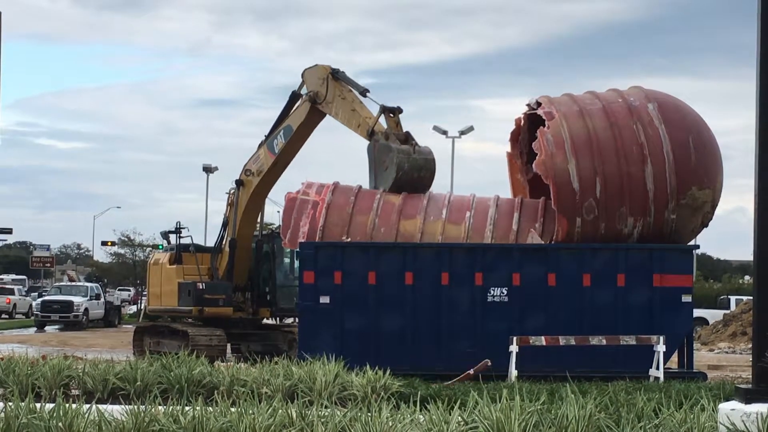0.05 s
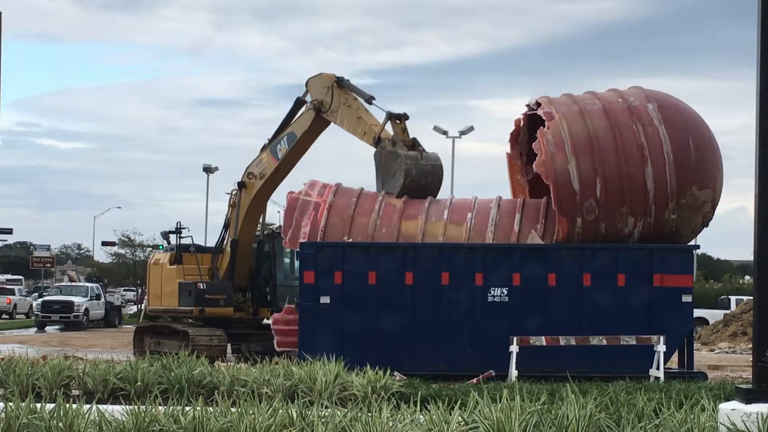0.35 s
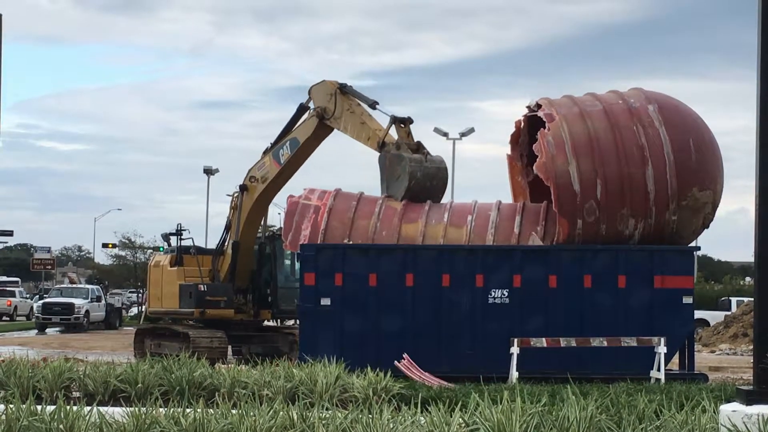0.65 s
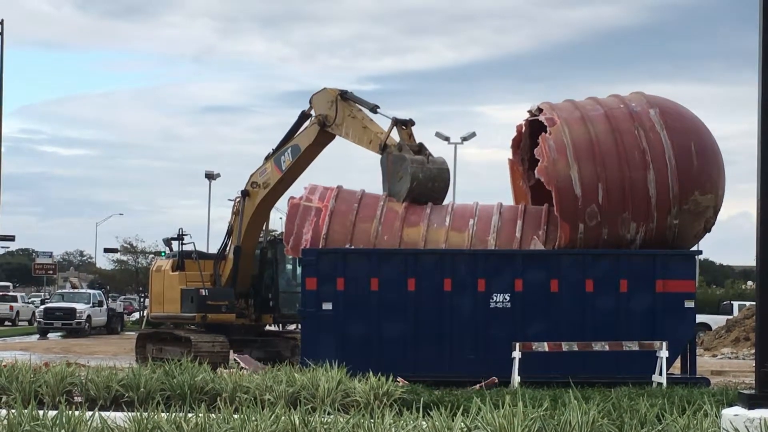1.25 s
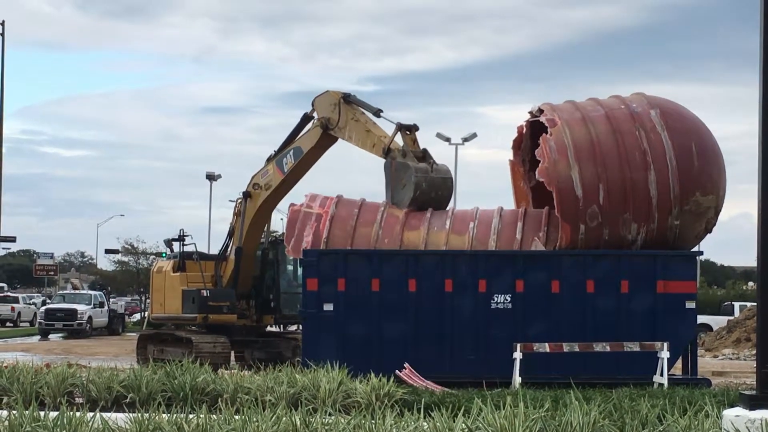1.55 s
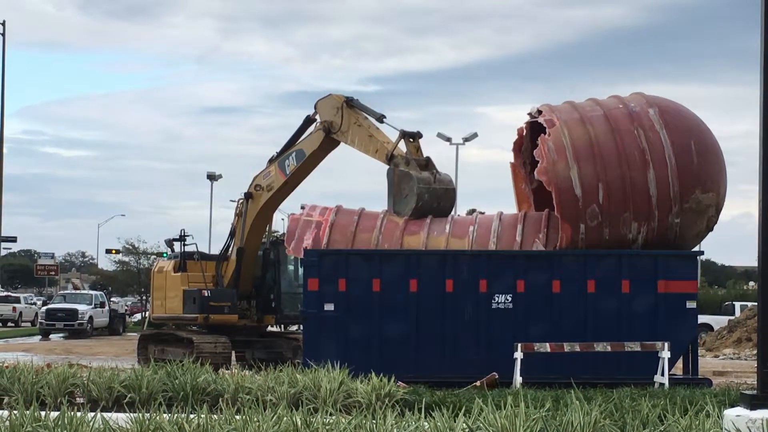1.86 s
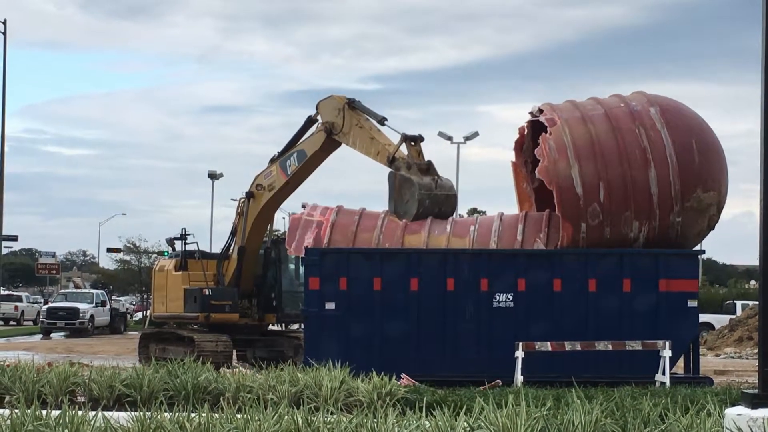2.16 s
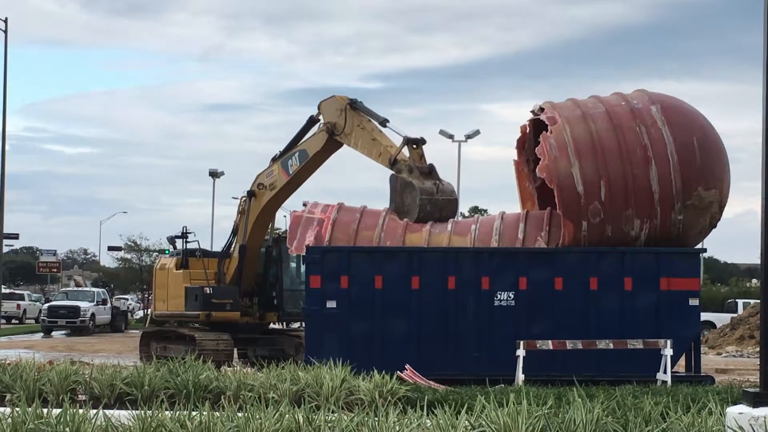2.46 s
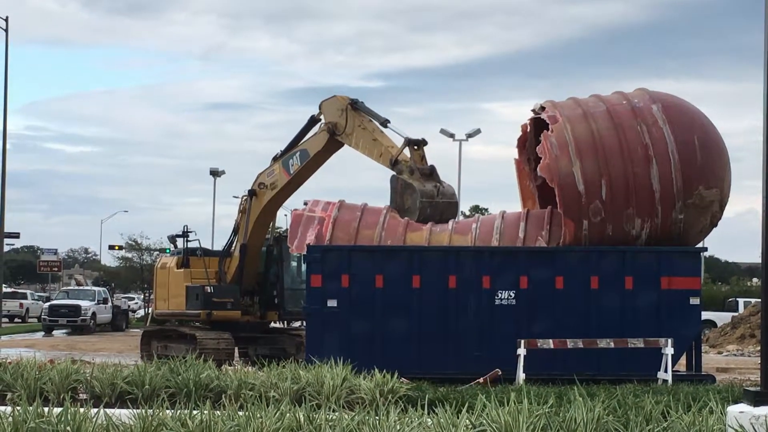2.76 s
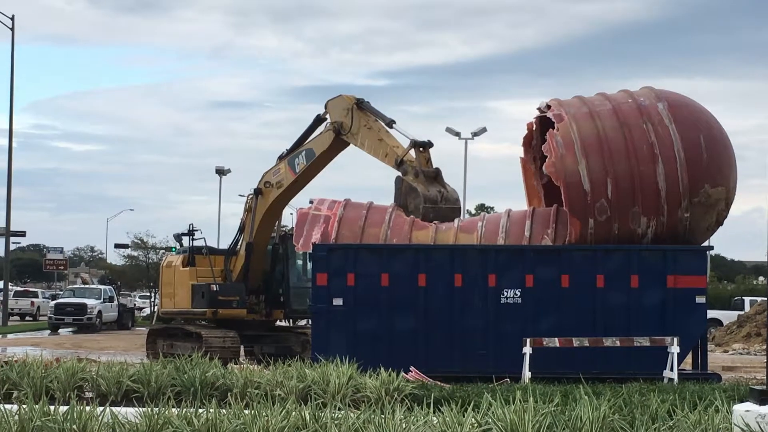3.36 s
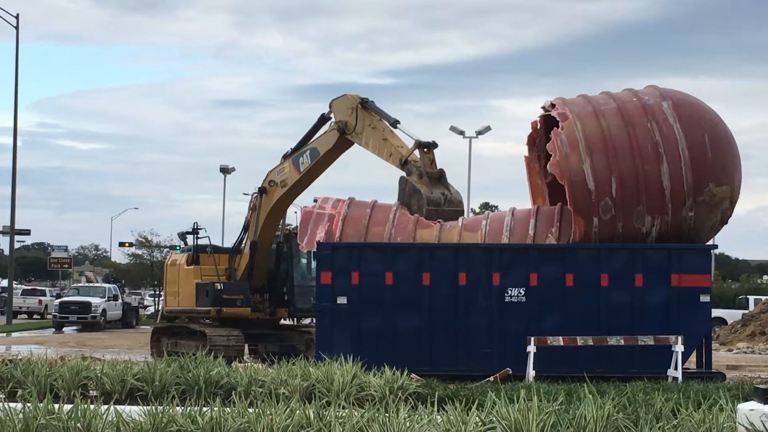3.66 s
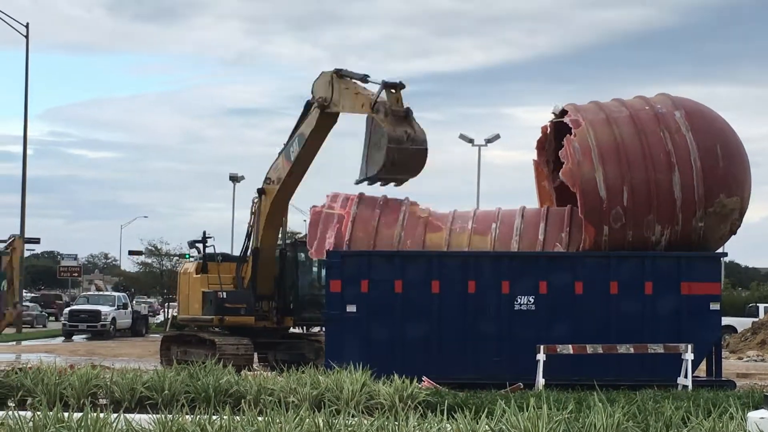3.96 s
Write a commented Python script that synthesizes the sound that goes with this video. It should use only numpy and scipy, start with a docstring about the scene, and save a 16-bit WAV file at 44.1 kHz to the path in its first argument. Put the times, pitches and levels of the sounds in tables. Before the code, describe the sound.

Fibreglass splinters and snaps as an excavator crushes a hollow tank in a steel skip outdoors. Two loud cracks come first, then a brief lull, then four more with dull thuds and short echoes, all over low engine rumble.

```python
"""An excavator crushes a tank

Across an open site, an excavator presses its bucket into a fibreglass tank lying in a steel skip.
The wall gives way in six loud cracks that knock the shell and boom in the hollow; between them it
snaps, crackles and buckles under the load. The diesel engine rumbles throughout."""
import sys
import numpy as np
from scipy import signal
from scipy.fft import rfft, irfft, next_fast_len
from scipy.io import wavfile
from scipy.ndimage import uniform_filter1d

SR = 44100
rng = np.random.default_rng(int(sys.argv[2]) if len(sys.argv) > 2 else 0)


def digitize_waveform(pressure):
    """Quantize a signal to 16-bit integers and store it at the path in sys.argv[1].

    Rows of a 2-D input are taken as channels; values are limited to [-1, 1].
    """
    field = np.atleast_2d(pressure).T
    bounded = np.clip(field, -1, 1)
    quanta = np.round(bounded * 32767).astype(np.int16)
    wavfile.write(sys.argv[1], SR, quanta)


N = 176400  # 4 seconds


def amp(db):
    """Turn decibels into a number to multiply by."""
    return 10 ** (np.asarray(db) / 20)

def rms_one(x):
    """Scale a sound to an average (rms) strength of 1."""
    return x / np.sqrt(np.mean(x ** 2) + 1e-20)

def level(rows):
    """Join (t/s, level/dB) points into a volume curve."""
    return amp(np.interp(np.arange(N) / SR, *np.transpose(rows)))

def drift(rate_hz):
    """A smooth random wobble, about 1 in size."""
    step = 40  # samples between random points
    pole = np.exp(-2 * np.pi * rate_hz * step / SR)
    noise = rng.standard_normal(N // step + 2002)
    slow = signal.lfilter([1], [1, -2 * pole, pole * pole], noise)[2000:]
    return np.interp(np.arange(N) / step, np.arange(len(slow)), rms_one(slow))

def colour(x, points):
    """Shape a sound's bass and treble to follow (f/Hz, level/dB) points."""
    size = 2 * next_fast_len(len(x))
    hz, db = np.transpose(points)
    log_hz = np.log(np.arange(size // 2 + 1) * SR / size + 1)
    cepstrum = irfft(np.log(amp(np.interp(log_hz, np.log(hz), db))))
    # minimum phase: nothing rings before the hit that causes it
    cepstrum[1:size // 2] *= 2
    cepstrum[size // 2 + 1:] = 0
    return irfft(rfft(x, size) * np.exp(rfft(cepstrum)))[:len(x)]

def add(out, s, sound):
    """Mix a sound in, starting at s seconds."""
    i = max(int(s * SR), 0)
    out[i:i + len(sound)] += sound[:max(len(out) - i, 0)]

def clicks(count, per_s, spread_db):
    """Random clicks of uneven size and sign."""
    sizes = amp(spread_db * np.minimum(rng.exponential(1, count), 4))
    return sizes * rng.choice([-1, 1], count) * (rng.random(count) < per_s / SR)

def shiver(hits, t60):
    """Each break shakes its patch of wall: a burst of noise that fades by 60 dB in t60 seconds."""
    energy = signal.lfilter([1], [1, -amp(-120 / (t60 * SR))], hits ** 2 + 1e-18)
    return np.sqrt(energy) * rng.standard_normal(len(hits))

def ring(hz, db, t60):
    """One struck note that swells over its first cycle and dies away."""
    t = np.arange(SR // 2) / SR
    return 2 * amp(db - 60 * t / t60) * np.sin(2 * np.pi * hz * t) * np.minimum(t * hz, 1)


# The deep tone of the engine: f/Hz, level/dB
ENGINE_TONE = [(15, -62), (30, -50), (41, 0.5), (50, -10.0), (64, 4.0), (85, 3.0), (115, -10.5),
               (160, -5.5), (200, -9.0), (260, -22.5), (500, -30.0), (2000, -68.5)]
# The engine works harder while the bucket bears down: t/s, level/dB
ENGINE_EFFORT = [(0, -31.5), (.6, -29.5), (1.35, -33.5), (2.3, -29.5), (3.1, -33.5), (4, -31.5)]

def engine():
    """The diesel rumbles, with a faint, unsteady hum from its firing."""
    firing_hz = 113.3 * (1 + 0.0309 * drift(rate_hz=5.96))
    hum = np.sin(2 * np.pi * np.cumsum(firing_hz) / SR)
    rumble = colour(rng.standard_normal(N), ENGINE_TONE)
    power = uniform_filter1d(rumble ** 2, size=int(0.12 * SR)) + 1e-9
    steadier = rumble / power ** 0.1  # evens out the lumps a little
    return level(ENGINE_EFFORT) * rms_one(steadier) + amp(-40) * rms_one(hum)


# The tone of the outdoor background: f/Hz, level/dB
SITE_TONE = [(40, -17), (280, 11.5), (450, 3.5), (750, 3.5), (1300, 0.5), (2100, -4), (2950, -18),
             (3250, -4), (4200, -8.5), (6600, -17), (7500, -20), (15000, -28)]

def site():
    """A steady outdoor wash of noise with a thin, shrill edge."""
    return amp(-41.5) * rms_one(colour(rng.standard_normal(N), SITE_TONE))


FIBRE_T60_S, SHELL_T60_S = .019, .036  # how long one tiny break rings
# The bright tone of splitting fibres: f/Hz, level/dB
SPLINTER_TONE = [(300, -26), (1000, 4.5), (1400, 1.5), (2100, 4.5), (2550, -3), (3000, 1), (3500, 5),
                 (4600, -2.5), (6500, -1), (7400, -6.5), (9200, -6.5), (10500, -11.5), (12000, -10.5),
                 (13500, -17), (16000, -19)]
# The low tone of the crunching shell: f/Hz, level/dB
CRUNCH_TONE = [(50, -17), (110, 10), (180, 9.5), (250, 1.5), (380, 4), (550, 1.5), (750, -6), (1000, -8),
               (1400, -17), (1900, -21.5), (2600, -16.5), (5000, -70), (15000, -46)]
# How loudly the fibres crackle: t/s, level/dB
CRACKLE_LEVELS = [(0, -48.5), (.06, -45), (.16, -35.5), (.5, -35.5), (.58, -38.5), (.75, -36.5),
                  (.83, -41.5), (.9, -40.5), (1.0, -39), (1.08, -45), (1.33, -51), (1.46, -51.5),
                  (1.56, -38), (1.71, -35.5), (1.75, -39.5), (1.87, -33), (2.08, -39.5), (2.26, -31),
                  (2.42, -38.5), (2.55, -42.5), (2.68, -37.5), (2.84, -48.5), (2.98, -39), (3.07, -48.5),
                  (3.25, -36.5), (3.41, -43), (3.57, -33), (3.71, -44.5), (3.88, -38), (4, -40.5)]
# How loudly the shell crunches: t/s, level/dB
CRUNCH_LEVELS = [(0, -45.5), (.15, -29.5), (.3, -30), (.48, -28.5), (.62, -34.5), (.9, -30.5), (1.12, -51),
                 (1.45, -42.5), (1.58, -41), (1.67, -30), (1.8, -32.5), (2.08, -34), (2.28, -26),
                 (2.4, -34.5), (2.58, -33.5), (2.67, -22.5), (2.73, -33), (2.83, -40), (2.96, -34.5),
                 (3.07, -40), (3.42, -45), (3.49, -36), (3.59, -32.5), (3.70, -44), (4, -37)]

def crushing():
    """Fibres part and the shell crunches in shared clumps as the bucket bears down."""
    clumps = amp(1.7 * drift(rate_hz=6.7))
    fibres = shiver(clumps * clicks(N, per_s=1700, spread_db=2.8), FIBRE_T60_S)
    shell = shiver(clumps * clicks(N, per_s=620, spread_db=2.5), SHELL_T60_S)
    crackle = level(CRACKLE_LEVELS) * rms_one(colour(fibres, SPLINTER_TONE))
    crunch = level(CRUNCH_LEVELS) * rms_one(colour(shell, CRUNCH_TONE))
    return crackle + crunch


def tear(length_s, tone, db, t60):
    """A split runs through the wall: one hard break, then a quick string of others."""
    t = np.arange(SR // 10) / SR
    breaks = clicks(len(t), per_s=380, spread_db=2)
    breaks[0] = amp(1.5)
    fade = amp(-3.5 * t / length_s) * np.clip((length_s - t) * 1000, 0, 1)
    sound = colour(shiver(breaks * fade, t60), tone)
    return amp(db) * sound * np.sqrt(length_s * SR / np.sum(sound ** 2))


# The tone of a small knock on the shell: f/Hz, level/dB
KNOCK_TONE = [(100, -21), (250, -1.5), (420, -2.5), (650, 1), (1000, -2.5), (1400, -11.5), (1950, -3),
              (2600, -16), (5000, -12), (15000, -63)]
# Quick snaps: t/s, splinter level/dB, knock level/dB
QUICK_SNAPS = [(.111, -43, -28), (.138, -30.5, -23), (.146, -28, -23), (.180, -40, -28), (.2138, -38, -24),
               (0.2363, -37, -29), (0.2555, -44, -28), (.269, -25.5, -27), (0.4401, -25, -34),
               (.507, -34, -50), (.897, -28.5, -44), (1.179, -33, -44), (1.188, -31.5, -56),
               (1.519, -32.5, -31), (1.6128, -37, -27), (1.649, -36, -27), (1.698, -28, -29),
               (1.8148, -27.5, -35), (1.8961, -32.5, -24.5), (1.975, -35, -25), (1.9974, -30.5, -25),
               (2.121, -33, -28), (2.227, -45, -23.5), (2.3521, -33, -30), (2.496, -30.5, -30),
               (2.5626, -29.5, -40), (2.939, -56, -30.5), (2.996, -33, -34), (3.46, -32.5, -35.5),
               (3.5071, -37, -19.5), (3.5449, -30, -22), (3.937, -25.5, -25)]
# Longer rips: t/s, tearing time/s, splinter level/dB, knock level/dB
LONG_RIPS = [(.877, 0.019, -35.5, -33), (1.675, 0.017, -31.5, -37), (1.687, 0.021, -27.5, -30),
             (3.486, 0.013, -38, -31.5), (3.595, .014, -35.5, -34)]

def snaps(snap_s=.004):
    """The wall snaps and rips; each patch knocks at a pitch of its own."""
    out = np.zeros(N)
    quick = [(s, snap_s, *levels) for s, *levels in QUICK_SNAPS]
    for s, length_s, splinter_db, knock_db in quick + LONG_RIPS:
        octaves = .25 * rng.uniform(-1.27, 1)
        knock_tone = [(hz * 2 ** octaves, db) for hz, db in KNOCK_TONE]
        add(out, s, tear(length_s, SPLINTER_TONE, splinter_db, FIBRE_T60_S))
        add(out, s, tear(length_s, knock_tone, knock_db, SHELL_T60_S))
    return out + echoes(out)


# The skip and the site ring on: lowest f/Hz, highest f/Hz, level/dB, time to fade by 60 dB/s
ECHO_BANDS = [(110, 330, -5.5, .48), (428, 747, -6, 0.37), (950, 2200, -5, 0.41), (2430, 11000, -9, 0.52)]

def echoes(x, swell_s=0.0047):
    """One dull slap off the skip, and a scattered tail that dies band by band."""
    t = np.arange(SR) / SR
    tail = 0
    for low, high, db, t60 in ECHO_BANDS:
        dying = rng.standard_normal(SR) * amp(-60 * t / t60) * (1 - np.exp(-t / swell_s))
        band = signal.butter(2, [low, high], "band", fs=SR, output="sos")
        tail = tail + amp(db) * signal.sosfilt(band, dying / np.sqrt(np.sum(dying ** 2)))
    slap = signal.sosfilt(signal.butter(1, 2000, fs=SR, output="sos"), x)
    out = np.zeros(len(x))
    add(out, .018, signal.fftconvolve(x, tail))
    add(out, .029, amp(-14.5) * slap)
    return out


# Thuds of the bending wall: t/s, f/Hz, level/dB
THUDS = [(0.168, 80, -17), (0.411, 86, -25), (1.766, 133, -22.5), (1.81, 103.6, -16.5), (1.835, 131, -18),
         (2.27, 73.5, -17.5), (2.657, 126, -20), (2.727, 82, -14), (3.96, 109, -24.5)]

def buckles():
    """The hollow tank gives a dull thud each time its wall buckles."""
    out = np.zeros(N)
    for s, hz, db in THUDS:
        add(out, s, ring(hz, db, t60=0.095))
    return out


# The tone of a hard knock on the shell: f/Hz, level/dB
SHELL_TONE = [(60, -37), (150, -4.5), (230, -3), (340, 2.5), (480, 2), (620, 1), (820, -4.5), (1250, -12),
              (1650, -13), (2300, -18.5), (5000, -21), (15000, -89)]
# The six big cracks: t/s, tearing time/s, splinter level/dB,
# knock level/dB, knock pitch/ratio, knock bass cut f/Hz, panel f/Hz, panel level/dB,
# upper panel note f/Hz, its level/dB, echo level/dB, boom f/Hz, boom level/dB
BIG_CRACKS = [(0.3246, .011, -24.5, -13, 1.21, 130, 462, -21, 1820, -20.5, 0.5, 104, -17),
              (.674, .012, -25, -13, 0.94, 397, 363, -10.5, 717, -14.5, 2, 90.5, -29),
              (1.4676, .014, -28.5, -23, 1.13, 100, 502, -21.5, 856, -27, -1, 99, -22.5),
              (2.1358, .02, -27.5, -15.5, 0.87, 120, 408, -17.5, 840, -19, 0, 69, -13.5),
              (2.4306, 0.017, -24, -15, 1.02, 110, 522, -19.5, 1197, -21, 2, 75.8, -8),
              (2.6153, 0.0087, -22, -14, 1.15, 90, 411, -26, 900, -16.5, 2.5, 88, -12)]

def cracks():
    """The wall gives way: splinters and a knock echo, the freed panel rings and the hollow booms."""
    out = np.zeros(N)
    for (s, length_s, splinter_db, knock_db, pitch, cut_hz, panel_hz, panel_db,
         upper_hz, upper_db, echo_db, boom_hz, boom_db) in BIG_CRACKS:
        knock_tone = [(hz * pitch, db) for hz, db in SHELL_TONE]
        bass_cut = signal.butter(3, cut_hz, "high", fs=SR, output="sos")
        crack = np.zeros(SR)
        add(crack, 0, tear(length_s, SPLINTER_TONE, splinter_db, FIBRE_T60_S))
        add(crack, 0, signal.sosfilt(bass_cut, tear(length_s, knock_tone, knock_db, SHELL_T60_S)))
        add(out, s, crack + amp(echo_db) * echoes(crack))
        add(out, s, panel(panel_hz, panel_db, upper_hz, upper_db) + boom(boom_hz, boom_db))
    return out

def panel(hz, db, upper_hz, upper_db):
    """A freed piece of wall rings briefly with three notes at once."""
    lower_notes = ring(hz, db, t60=.058) + ring(hz * 1.44, db - 2.5, t60=.058)
    return lower_notes + ring(upper_hz, upper_db, t60=.04)

def boom(hz, db):
    """The hollow of the tank sounds a low note and a softer one an octave up."""
    return ring(hz, db, t60=0.13) + ring(hz * 2, db - 8.5, t60=0.13)


def scene():
    """The breaking tank over the engine and the site, in one channel."""
    return (cracks() + snaps() + buckles() + crushing() + engine() + site())[None]

def record(dry, ceiling=.51):
    """Squash the loudest peaks and cut the very highest treble."""
    squashed = dry / (1 + (dry / ceiling) ** 6) ** (1 / 6)
    treble_cut = signal.cheby2(16, 70, 16600, fs=SR, output="sos")
    return signal.sosfilt(treble_cut, squashed)


dry = scene()
out = record(dry)
digitize_waveform(out)
```